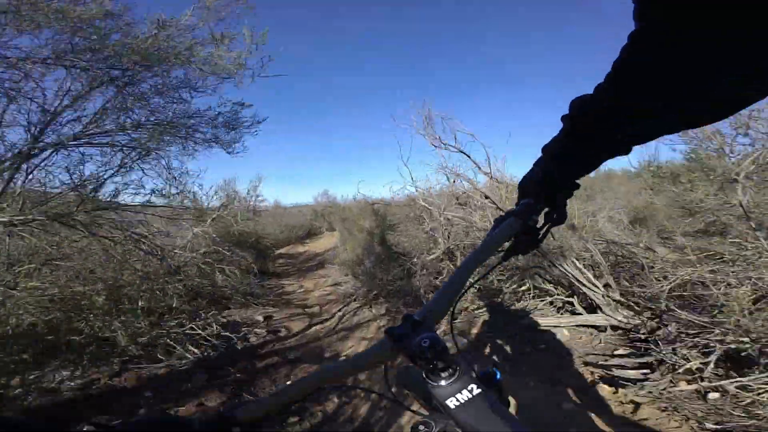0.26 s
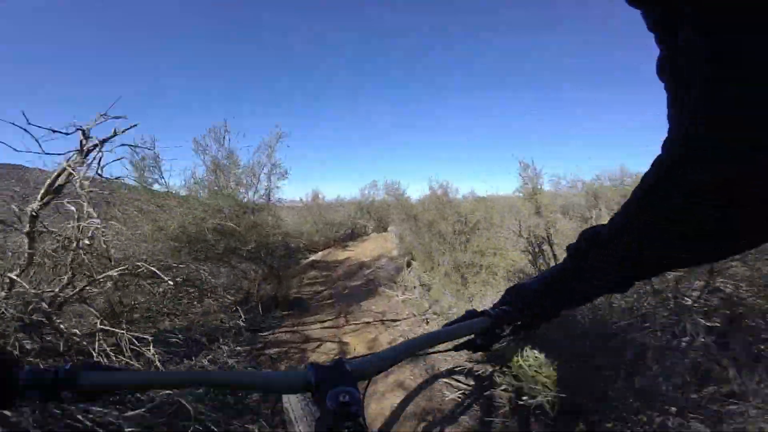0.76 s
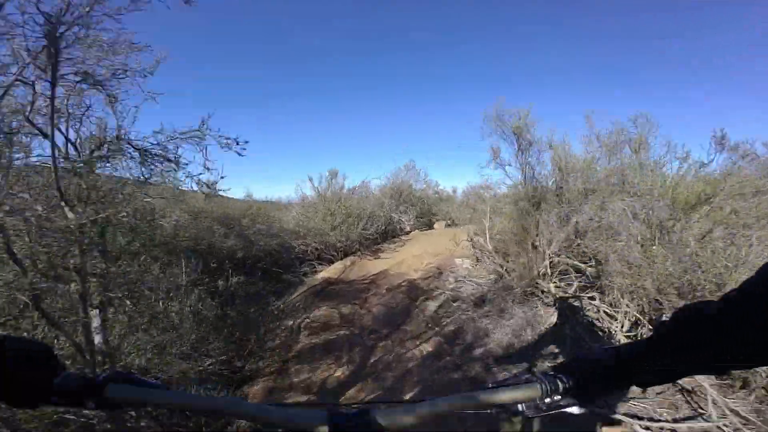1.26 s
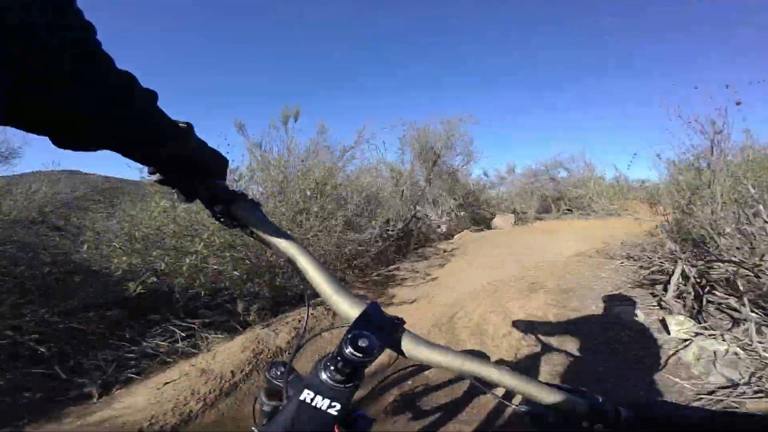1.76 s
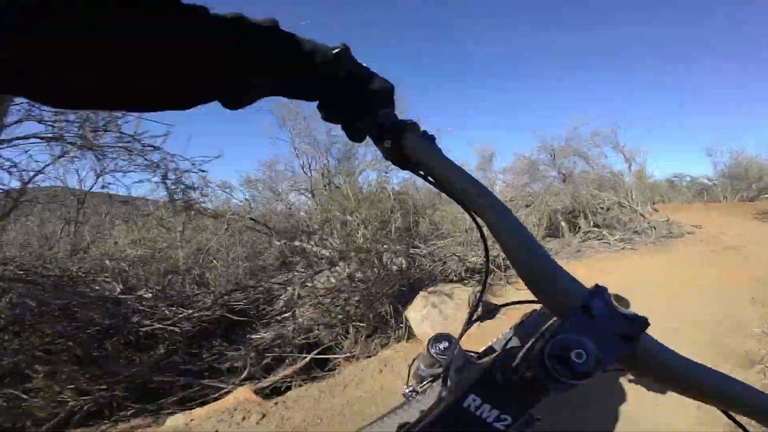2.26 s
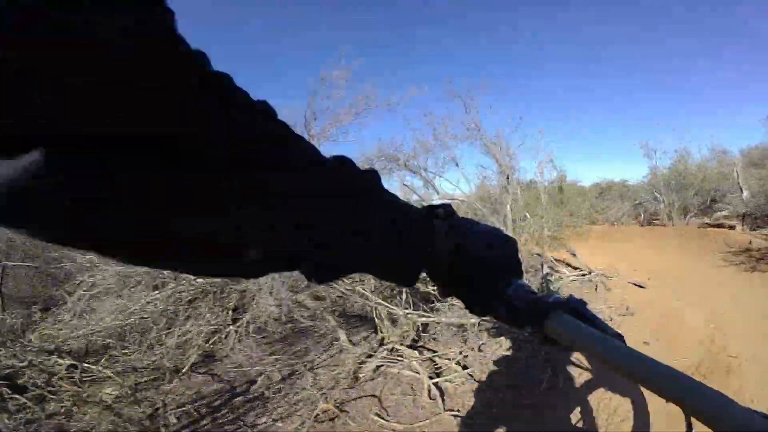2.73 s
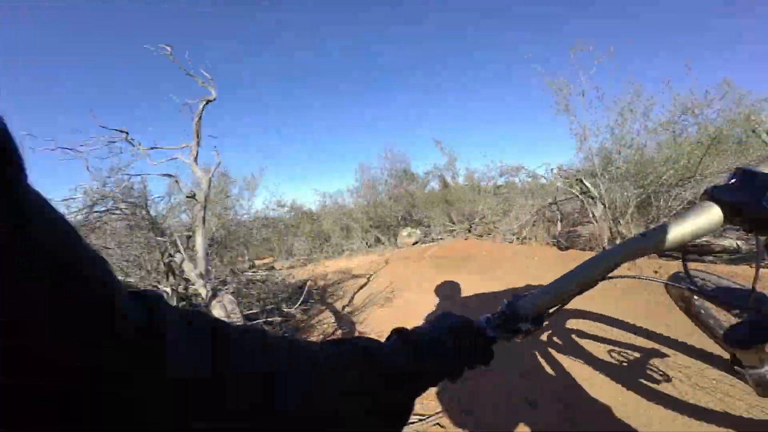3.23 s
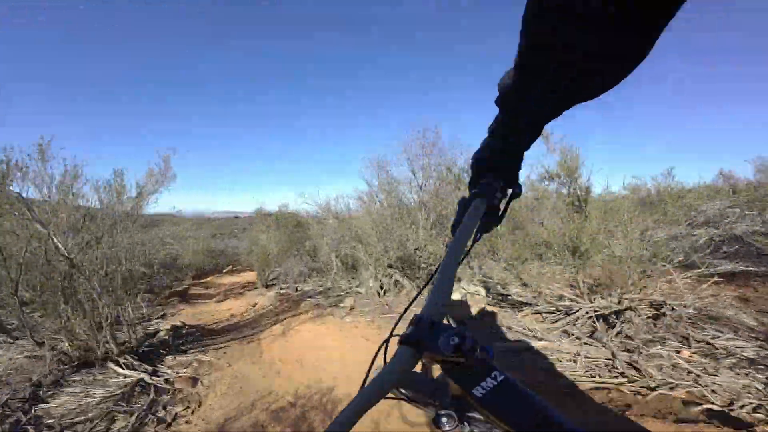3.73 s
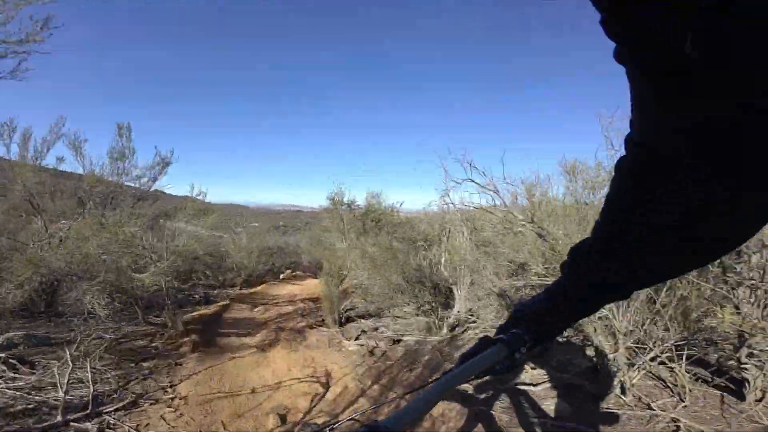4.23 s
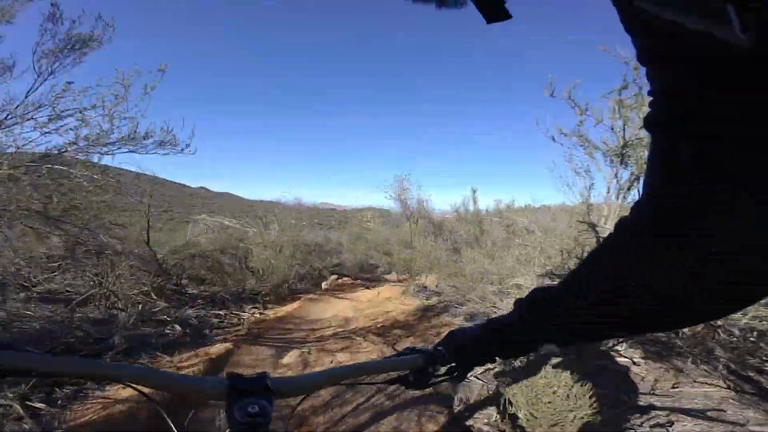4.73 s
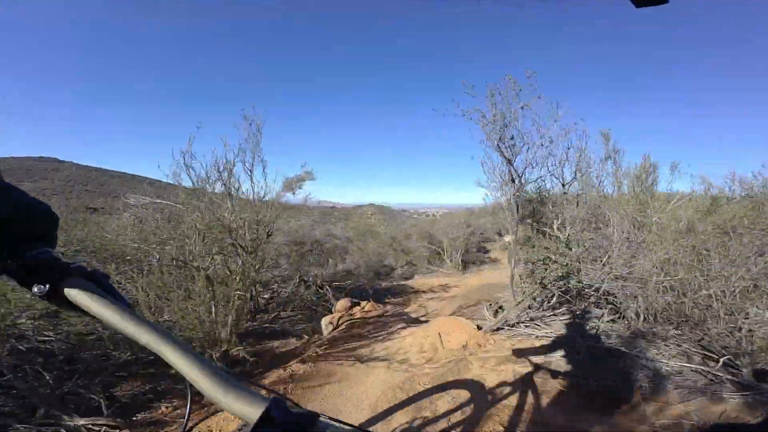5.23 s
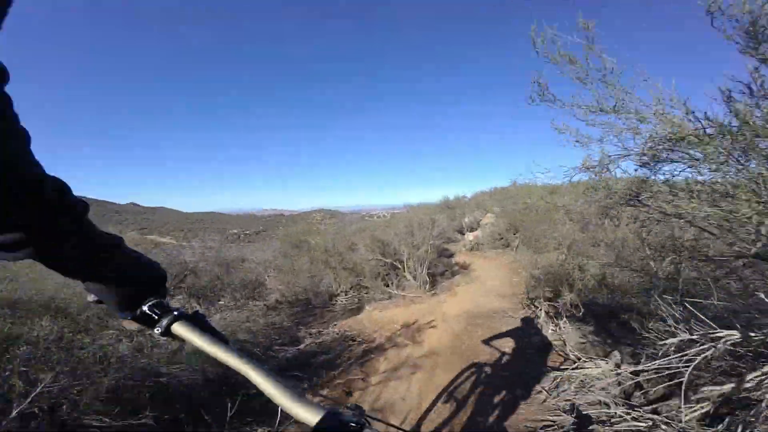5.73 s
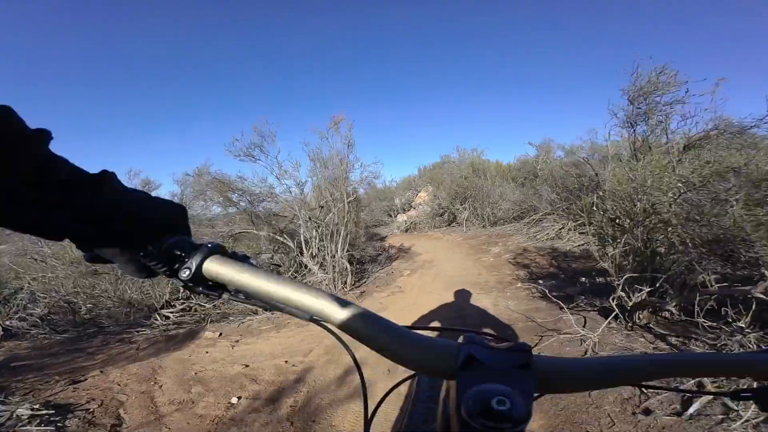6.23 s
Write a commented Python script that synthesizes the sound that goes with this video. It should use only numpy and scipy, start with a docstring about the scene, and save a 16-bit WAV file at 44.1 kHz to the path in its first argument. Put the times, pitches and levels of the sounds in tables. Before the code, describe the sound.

A mountain bike coasts down a dry dirt trail, heard close from the rider's chest. From the start the freehub gives a fast metallic buzz while the tyres hum, rumble and crunch over grit, with scattered sharp knocks from stones and twigs. Wind buffets the microphone heavily through the first second, then eases. Dry bushes scratch past at about 1.1 seconds and again around 2. Near 2.4 seconds the buzz slows and stops, the tyres slide briefly, and the buzz resumes at 2.8. From 3.5 to 5 seconds the wind returns in hard, rumbling blows and pops, while the freehub dips in level. The loudest short blasts hit around 5.6 seconds. At 5.75 the tyre noise drops for a small jump, and at about 6.1 the bike lands with a gritty skid and a metallic clatter, rolling on until 6.5 seconds.

```python
"""A mountain bike coasts down a dry dirt trail, heard from the rider's chest.
At first the freehub (the ratchet in the back wheel) buzzes, the tyres hum and crunch over grit, and wind
buffets the microphone. Stones and twigs knock on the bike, and from 1 s bushes sweep past.
Near 2.4 s the buzz stops for a moment in a bend. It starts again, and the wind returns in hard blows.
At 5.75 s the tyres leave the ground in a small jump, then land with a skid and a clatter."""
import sys
import numpy as np
from scipy import signal
from scipy.fft import rfft, irfft
from scipy.io import wavfile
from scipy.ndimage import uniform_filter1d

SR = 44100
rng = np.random.default_rng(int(sys.argv[2]) if len(sys.argv) > 2 else 0)


def wav_out(sig):
    """Save sig, one row per channel (or a flat mono array), as 16-bit PCM at SR to the path in sys.argv[1]."""
    wavfile.write(sys.argv[1], SR, np.round(np.clip(np.atleast_2d(sig).T, -1, 1) * 32767).astype(np.int16))


N = 285768
TIME = np.arange(N) / SR


def from_db(db):
    """Turn decibels into a number to multiply by."""
    return 10 ** (np.asarray(db) / 20)


def rms_one(x):
    """Scale a sound so its average strength (rms) is 1."""
    return x / np.sqrt(np.mean(x ** 2) + 1e-20)


def in_time(rows):
    """Join rows with straight lines, giving each column a value at every sample."""
    s, *columns = np.transpose(rows)
    return [np.interp(TIME, s, c) for c in columns]


def band(x, low, high, order=2):
    """Keep the frequencies between low and high, in Hz."""
    sos = signal.butter(order, [low, min(high, .45 * SR)], "band", fs=SR, output="sos")
    return signal.sosfilt(sos, x + 1e-18)


def drift(rate):
    """A smooth random wobble of size about 1; a higher rate wobbles faster."""
    r = np.exp(-80 * np.pi * rate / SR)
    slow = signal.lfilter([1], [1, -2 * r, r * r], rng.standard_normal(N // 40 + 2002))[2000:]
    return np.interp(np.arange(N) / 40, np.arange(len(slow)), rms_one(slow))


def coloured(x, colour):
    """Give a sound the listed balance of low and high frequencies, at strength 1."""
    hz, db = np.transpose(colour)
    size = 8192
    octave = np.log2(np.arange(size // 2 + 1) * SR / size + 1)
    beyond = np.abs(octave - np.clip(octave, np.log2(hz[0]), np.log2(hz[-1])))
    gain = from_db(np.interp(octave, np.log2(hz), db) - 18 * beyond)
    # build the filter so it rings only after a click, never before
    cepstrum = irfft(np.log(gain))[:size // 2]
    cepstrum[1:] *= 2
    return rms_one(signal.fftconvolve(x, irfft(np.exp(rfft(cepstrum, size))))[:N])


def resonance(x, hz, width_hz):
    """Ring at one pitch; a narrower width rings longer."""
    r = np.exp(-np.pi * width_hz / SR)
    feedback = [1, -2 * r * np.cos(2 * np.pi * hz / SR), r * r]
    return signal.lfilter(np.array([1, 0, -1]) * (1 - r * r) / 2, feedback, x + 1e-18)


def evened(x, window_s):
    """Keep the fast texture of a noise but take out its slow swells."""
    return x / np.sqrt(np.abs(uniform_filter1d(x * x, max(int(window_s * SR), 2))) + 1e-9)


def grains(per_s, spread_db):
    """Random clicks, many small and a few large."""
    sizes = from_db(spread_db * np.minimum(rng.exponential(1, N), 5)) * rng.choice([-1, 1], N)
    return rms_one(sizes * (rng.random(N) < per_s / SR))


def envelope(start_s, length_s, attack_s, release_s):
    """Fade in, hold until the length is over, then fade out."""
    rise = np.clip((TIME - start_s) / attack_s, 0, 1)
    return rise * np.clip(1 - (TIME - start_s - length_s) / release_s, 0, 1)


def add(out, s, sound):
    """Mix a sound in, starting at s seconds."""
    start = max(int(s * SR), 0)
    out[start:start + len(sound)] += sound[:max(N - start, 0)]


def mic_hiss(level_db=-66):
    """A faint, even hiss from the microphone."""
    return from_db(level_db) * rms_one(band(rng.standard_normal(N), 3000, 10000))


# Bushes along the trail. Each row: time of closest touch in seconds, level in dB.
BUSHES = [(1.1, -30.5), (1.68, -56), (1.93, -40.5), (2.08, -43), (2.18, -51)]
# The tone of their scratching. Each row: frequency in Hz, relative level in dB.
BRUSH_COLOUR = [(1500, -34), (2200, -3), (4000, -6), (5600, 1), (7000, -6), (9000, -17), (14000, -36)]
def brush(fade_db_per_s=122):
    """Dry twigs scratch past; each bush swells and fades."""
    touch = sum(from_db(db - fade_db_per_s * np.abs(TIME - s)) for s, db in BUSHES)
    return touch * coloured(grains(per_s=5000, spread_db=3.5), BRUSH_COLOUR)


# Blows of wind. Each row: start in seconds, length in seconds, level in dB, sharpness in dB.
WIND_BLOWS = [(0, 0.2, -34.5, -29), (0.171, 0.16, -16.5, -14), (0.291, 0.29, -16, -8.5),
              (0.61, 0.16, -25, -9.5), (0.723, .2, -20, -9), (1.15, 0.073, -30.5, -6.5),
              (3.367, 0.14, -30, -19), (3.488, .11, -16, -5), (3.623, 0.094, -17, -17),
              (3.769, 0.2, -17.5, -3), (3.959, 0.19, -13.5, -8), (4.162, 0.22, -19, 2),
              (4.487, 0.28, -21, -20), (4.664, 0.11, -14.5, -10), (4.851, 0.057, -18.5, -24),
              (5.2, .11, -30, -21), (5.405, 0.15, -27.5, -27)]
# The tone of the wind. Each row: frequency in Hz, relative level in dB.
WIND_COLOUR = [(40, -32), (80, -11), (130, 0), (220, 3), (320, -2), (450, -8), (700, -23), (1000, -38),
               (1500, -44.5), (2500, -60.5)]
def headwind(lumpy_db=2.5, edge_lumpy_db=3.5, edge_db=-4, split_hz=600):
    """Swirls of air tumble over the microphone: large ones rumble, small ones add a sharp edge."""
    swirls = coloured(rng.standard_normal(N) + 0.99 * grains(per_s=500, spread_db=2.0), WIND_COLOUR)
    lumps = drift(35)
    large = signal.sosfilt(signal.butter(3, split_hz, fs=SR, output="sos"), swirls)
    small = signal.sosfilt(signal.butter(3, split_hz, "high", fs=SR, output="sos"), swirls)
    large = evened(large * from_db(lumpy_db * lumps), .05)
    small = evened(small * from_db(edge_lumpy_db * lumps), 0.091)
    body, edge = 0, 0
    for s, length, level_db, sharp_db in WIND_BLOWS:
        blow = from_db(level_db) * envelope(s, length, attack_s=0.014, release_s=0.053)
        body = np.maximum(body, blow)
        edge = np.maximum(edge, from_db(sharp_db) * blow)
    return body * large + from_db(edge_db) * edge * small


# Single gusts. Each row: start in seconds, length in seconds, pitch in Hz, level in dB.
GUSTS = [(0.473, 0.013, 570, -30), (0.565, 0.02, 574, -23.5), (.815, 0.011, 493, -23),
         (0.869, 0.0081, 553, -27), (0.924, .015, 446, -24.5), (1.171, .025, 285, -20.5),
         (1.404, 0.022, 258, -23.5), (3.457, 0.011, 368, -20.5), (3.533, 0.034, 620, -20.5),
         (3.962, 0.017, 645, -21.5), (4.181, 0.019, 640, -18), (4.292, 0.062, 635, -23),
         (4.365, 0.031, 685, -26), (4.729, 0.04, 426, -20.5), (4.866, .03, 552, -21),
         (5.230, .008, 601, -27), (5.418, .011, 550, -20), (5.468, 0.0092, 388, -21.5),
         (5.52, 0.019, 576, -23.5), (5.582, 0.017, 504, -22.5), (5.59, 0.027, 840, -8.5),
         (5.609, 0.023, 740, -12), (5.678, 0.016, 352, -17), (5.694, .016, 375, -9),
         (5.708, 0.04, 307, -15)]
def gusts(spread=1.346, low_share=0.9):
    """Short blasts of air tear across the microphone."""
    out = np.zeros(N)
    for s, length, hz, level_db in GUSTS:
        white = rng.standard_normal(SR // 5)
        tearing = rms_one(band(white, hz / spread, hz * spread, order=3))
        low = low_share * rms_one(band(white[::-1], hz / 6, hz))
        swell = signal.windows.tukey(int((length + .008) * SR), .4)
        add(out, s - .004, from_db(level_db) * swell * evened(tearing + low, .015)[-len(swell):])
    return out


# Bumps and pops of air. Each row: start in seconds, relative level in dB, pitch in Hz.
THUMPS = [(0.515, -7, 213), (1.556, -17, 70), (2.278, -19.5, 70), (2.632, -17, 77), (2.712, -21, 80),
          (3.51, -17, 70), (3.794, -7.5, 233), (4.003, -0.5, 377), (4.044, -4.5, 444), (4.527, -15, 700),
          (4.628, -7, 254), (4.706, -9, 616), (4.731, -8.5, 590), (5.418, -5, 107.4), (5.473, -8, 119.9),
          (5.993, -19.5, 71), (6.405, -16, 121)]
def thumps(fade_cycles=0.55, gain_db=4):
    """A jolt or a pop of air swings the thin skin inside the microphone out and back."""
    out, t = np.zeros(N), TIME[:SR // 10]
    for s, level_db, hz in THUMPS:
        swing = np.sin(2 * np.pi * hz * t) * np.exp(-hz * t / fade_cycles) * (1 - np.exp(-10 * hz * t))
        add(out, s, from_db(level_db + gain_db) * band(swing, hz / 4, hz * 5))
    return out


def tyre_load(takeoff_s=5.75, landing_s=6.07, airborne_db=-8.5, landing_db=4.5):
    """Weight on the tyres in dB: light during the jump, heavy just after the landing."""
    airborne = airborne_db * np.clip((TIME - takeoff_s) / 0.0086, 0, 1)
    settling = landing_db * np.exp(-np.abs(TIME - landing_s) / 0.037)
    return uniform_filter1d(np.where(TIME < landing_s, airborne, settling), SR // 100)


# How rough the trail is. Each row: time in seconds, relative level in dB.
ROUGHNESS = [(0, -31.5), (.22, -25), (.62, -34.5), (.9, -30), (1.4, -37.5), (1.82, -46.5), (2.25, -42.5),
             (3.17, -42), (3.5, -29), (3.85, -34), (4.2, -31), (4.42, -33), (4.68, -24.5), (5.02, -35),
             (5.5, -22.5), (5.85, -36), (6.48, -36)]
# The tones of tyre rumble and frame shudder. Each row: frequency in Hz, relative level in dB.
RUMBLE_COLOUR = [(22, 0), (35, -7), (50, 7.5), (65, -0.5), (120, -7.5), (400, -45)]
SHUDDER_COLOUR = [(50, -27), (70, 3.5), (95, 0.5), (125, -4), (200, -8.5), (350, -19.5), (700, -38.5)]
def rough_ground(rumble_db=-4, follows_load=0.5):
    """The tyres rumble over the trail and shake the frame."""
    rough_db = in_time(ROUGHNESS)[0] + follows_load * tyre_load()
    rumble = from_db(rumble_db) * evened(coloured(rng.standard_normal(N), RUMBLE_COLOUR), 0.18)
    shudder = evened(coloured(rng.standard_normal(N), SHUDDER_COLOUR), 0.12)
    return from_db(rough_db) * (rumble + shudder)


# Loose grit on the trail. Each row: time in seconds, relative level in dB.
GRIT = [(0, -35), (.45, -45), (.7, -47), (1.05, -41), (2.2, -36.5), (2.47, -42.5), (2.95, -41.5),
        (3.32, -37), (4.12, -46), (5.2, -40), (5.53, -37.5), (5.72, -43.5), (6.48, -38.5)]
# The tone of the crunch. Each row: frequency in Hz, relative level in dB.
GRIT_COLOUR = [(300, 18), (600, 8.5), (1000, 2), (2000, 6.5), (3000, 3.5), (4500, -4), (6500, -7.5),
               (9000, -20), (12000, -31), (15000, -51)]
# Skids. Each row: start in seconds, length in seconds, relative level in dB.
SKIDS = [(2.53, 0.13, -38.5), (4.175, 0.016, -43), (4.312, 0.032, -46), (4.505, 0.03, -35),
         (4.677, 0.026, -40), (5.358, 0.16, -36), (6.071, 0.16, -32.5)]
def grit(gain_db=3):
    """The tyres crush grit as they roll and spray it when they slide."""
    crunch = rms_one(grains(per_s=4000, spread_db=4.5) + 0.89 * rng.standard_normal(N))
    rolling = from_db(in_time(GRIT)[0] + tyre_load())
    sliding = sum(from_db(db) * envelope(s, length, attack_s=0.012, release_s=0.046)
                  for s, length, db in SKIDS)
    return from_db(gain_db) * np.hypot(rolling, sliding) * coloured(crunch, GRIT_COLOUR)


# Knobbly tyres on hard dirt. Each row: time in seconds, pitch in Hz, relative level in dB.
TREAD_HUM = [(0, 295, -39), (1.45, 396, -41), (1.8, 425, -37.5), (2.28, 379, -34.5), (2.47, 320, -49),
             (2.65, 298, -39.5), (3.1, 288, -40.5), (3.35, 279.9, -33), (4.0, 280, -49), (5.5, 300, -47),
             (6.15, 325, -35), (6.48, 310, -37)]
# Ringing of the tyres' air and casing. Each row: pitch in Hz, width in Hz, relative level in dB.
TYRE_RINGS = [(147, 8, -8), (243.3, 10.5, -2)]
def tread(width_octaves=0.11, gain_db=-1, follows_load=2.95):
    """Rubber knobs patter on the ground: a rough hum that follows the wheel's speed, over ringing tyres."""
    hum_hz, level_db = in_time(TREAD_HUM)
    hum = 0
    for hz in 150 * 2 ** (np.arange(10) / 4):   # noise bands a quarter of an octave apart
        nearness = 1 / (1 + (np.log2(hz / hum_hz) / width_octaves) ** 2)
        hum += nearness * rms_one(band(rng.standard_normal(N), hz / 2 ** (1 / 8), hz * 2 ** (1 / 8)))
    casing = sum(from_db(db) * evened(resonance(rng.standard_normal(N), hz, width), 0.16)
                 for hz, width, db in TYRE_RINGS)
    return from_db(level_db + gain_db + follows_load * tyre_load()) * (evened(hum, 0.069) + casing)


# Hits on the bike. Each row: start in seconds, relative level in dB, pitch in Hz,
# seconds for the rattle to fade by 60 dB.
KNOCKS = [(0.074, -17, 2030, .02), (0.504, -24.5, 2410, 0.033), (.745, -26, 1900, .02),
          (0.825, -16.5, 3150, 0.024), (0.828, -25.5, 9550, 0.017), (0.837, -14, 1880, 0.023),
          (1.037, -22, 1570, 0.016), (1.045, -20, 2120, 0.027), (1.090, -21, 2090, 0.06),
          (1.136, -20.5, 2150, 0.035), (1.551, -17.5, 2070, 0.02), (2.063, -20, 2010, .03),
          (2.326, -22, 3500, 0.02), (2.546, -24, 3150, 0.033), (2.658, -19, 3140, 0.022),
          (3.756, -27, 2160, 0.036), (4.453, -22.5, 2020, .025), (5.509, -16, 2320, 0.038),
          (5.511, -16, 5800, 0.012), (6.076, -13, 1920, 0.021), (6.1, -10, 2513, 0.057),
          (6.103, -14, 5180, 0.044), (6.126, -17.5, 4430, 0.054), (6.144, -19, 5870, 0.038),
          (6.182, -19, 1880, 0.037), (6.214, -10.5, 1300, 0.019), (6.220, -14.5, 1280, 0.05),
          (6.234, -21, 3000, 0.029), (6.377, -22, 2002, 0.035), (6.387, -12.5, 2100, 0.021)]
def knocks(spread=1.43, crack_share=0.35, clank_share=0.68, clank_stretch=1.6, gain_db=-7):
    """Each stone or twig gives a broad crack, a quickly dying rattle and a brief clank."""
    out, t = np.zeros(N), TIME[:SR // 6]
    for s, level_db, hz, fade_s in KNOCKS:
        white = rng.standard_normal((2, len(t)))
        rattle = rms_one(band(white[0], hz / spread, hz * spread))
        crack = crack_share * rms_one(band(white[1], 1400, 4500))
        clank = clank_share * np.sin(2 * np.pi * hz * t) * from_db(-60 * t / (fade_s * clank_stretch))
        add(out, s, from_db(level_db + gain_db) * ((rattle + crack) * from_db(-60 * t / fade_s) + clank))
    return out


def with_reflection(x, lag_s=.0016, sway_s=0.000262, strength=0.47):
    """A tiny echo off the ground shifts as the rider moves, making the tone waver."""
    return x + strength * np.interp(TIME - lag_s - sway_s * drift(2.5), TIME, x)


# Moments when the metallic note sings out. Each row: time in seconds, width in seconds, rise in dB.
NOTE_SWELLS = [(1.55, 0.018, 8), (1.77, 0.064, 6.5), (2.2, 0.037, 7), (2.92, 0.032, 8), (3.1, 0.028, 5),
               (3.68, 0.064, 6), (3.96, 0.12, 8.5)]
def metallic_note(strikes, hz=2797, width_hz=85, gain_db=7.5, sway_db=1.5):
    """Every ratchet click strikes one wavering note, likely from the brake disc."""
    singing_db = sum(rise_db * np.exp(-((TIME - s) / width) ** 2) for s, width, rise_db in NOTE_SWELLS)
    note = evened(resonance(strikes, hz, width_hz), .04)
    return from_db(gain_db + singing_db + sway_db * drift(12)) * note


# Ringing of hub, spokes and frame. Each row: pitch in Hz, width in Hz, relative level in dB.
HUB_RINGS = [(2698, 45, -0.5), (3090, 280, -5.5), (3417, 230, -1), (3665, 186, 0.5), (4034, 875, -4),
             (4363, 620, -9.5), (5200, 680, -21), (5994, 110, -4.5), (6474, 70, -11), (7000, 810, -15.5),
             (7140, 200, -13.5), (9050, 310, -17.5), (9500, 170, -20.5), (9980, 260, -19), (10450, 52, -16),
             (11530, 270, -24), (12100, 400, -24), (13700, 340, -31)]
def wheel_ring(force, sway_db=2.03, hiss_db=-26, sheen_db=-23):
    """The clicks set the metal ringing; each pitch swells and fades as the bike moves."""
    ringing = sum((-1) ** k * from_db(db + sway_db * drift(9.9)) * resonance(force, hz, width)
                  for k, (hz, width, db) in enumerate(HUB_RINGS))
    hiss = from_db(hiss_db) * band(force, 1500, 9000)
    # at the very top the clicks blur into a smooth sheen
    sheen = from_db(sheen_db) * rms_one(band(rng.standard_normal(N), 8100, 13500))
    return evened(rms_one(ringing + hiss), .12) + sheen


# Two spells of coasting, one list each. Each row: time in seconds, clicks per second.
COASTS = [
    [(0, 77), (.08, 76), (.21, 124), (.42, 82), (1.05, 75), (1.4, 116), (1.6, 83), (1.78, 106), (1.9, 93),
     (2.22, 79), (2.32, 37), (2.39, 22)],
    [(2.77, 98), (2.87, 107), (2.98, 84), (3.48, 90), (3.66, 113), (3.84, 53), (3.98, 48), (4.3, 62),
     (5.0, 64), (5.62, 82), (5.86, 68), (6.2, 69), (6.48, 104)],
]
# The hub's loudness as the rider shifts over it. Each row: time in seconds, relative level in dB.
HUB_LEVEL = [(0, -47.5), (.26, -48), (.45, -58.5), (.63, -58), (.85, -52), (1.5, -50), (2.2, -47.5),
             (2.38, -54), (2.77, -53.5), (2.86, -52), (3.42, -48), (3.85, -52.5), (4.3, -65.5),
             (4.66, -56.5), (5.3, -52.5), (5.75, -53.5), (6.48, -52)]
def freehub(ring_fade_s=0.046, chatter_fade_s=0.032, teeth=36, ring_gain_db=13.5):
    """Small catches drop off each ratchet tooth; every drop rings the wheel and adds a loose chatter."""
    rate = sum(np.interp(TIME, *np.transpose(coast), left=0, right=0) for coast in COASTS)
    teeth_passed = np.cumsum(rate) / SR
    tooth = np.maximum.accumulate(np.floor(teeth_passed + .004 * (rate > 1) * drift(30)))
    drops = (np.diff(tooth, prepend=tooth[0]) > 0) * from_db(1.2 * drift(70))
    t = TIME[:SR // 10]
    onset = 1 - np.exp(-t / .0014)   # the catches do not land quite together
    # the ring repeats from tooth to tooth, but blends between two shapes as the wheel turns
    rings = rng.standard_normal((2, len(t))) * onset * from_db(-60 * t / ring_fade_s)
    first, second = (signal.fftconvolve(drops, ring)[:N] for ring in rings)
    angle = 2 * np.pi * teeth_passed / teeth
    buzz = rms_one(np.cos(angle) * first + np.sin(angle) * second)
    bursts = signal.fftconvolve(drops, onset * from_db(-60 * t / chatter_fade_s))[:N]
    chatter = rms_one(bursts * rng.standard_normal(N))
    force = rms_one(with_reflection(buzz + .75 * chatter))
    # both parts fade away when the clicking slows down
    wheel = from_db(ring_gain_db) * wheel_ring(force) * np.clip(rate / 45, 0, 1)
    note = metallic_note(rms_one(drops) + chatter) * np.clip(rate / 40, 0, 1)
    return from_db(in_time(HUB_LEVEL)[0]) * (wheel + note)


def scene():
    """Bike, trail and wind, all close to the microphone in the open."""
    bike = freehub() + tread() + knocks()
    trail = rough_ground() + grit() + brush() + thumps()
    return (bike + trail + headwind() + gusts() + mic_hiss())[None]


def record(dry):
    """The loudest blasts clip, and the treble above 15150 Hz is cut."""
    return signal.sosfilt(signal.ellip(12, .1, 90, 15150, fs=SR, output="sos"), np.clip(dry, -1, 1))


dry = scene()
out = record(dry)
wav_out(out)
```